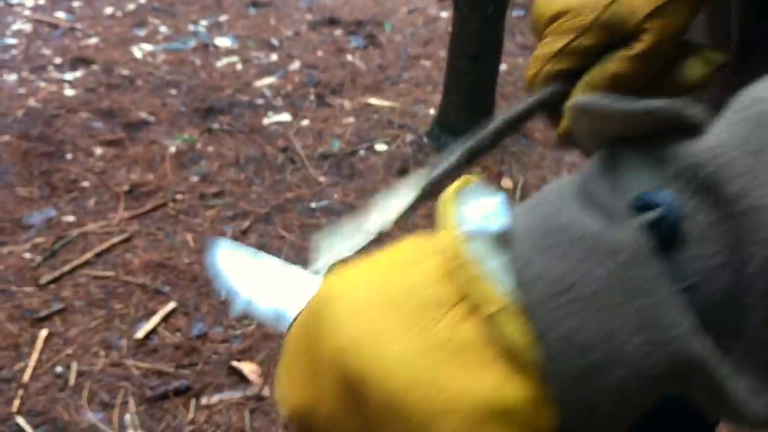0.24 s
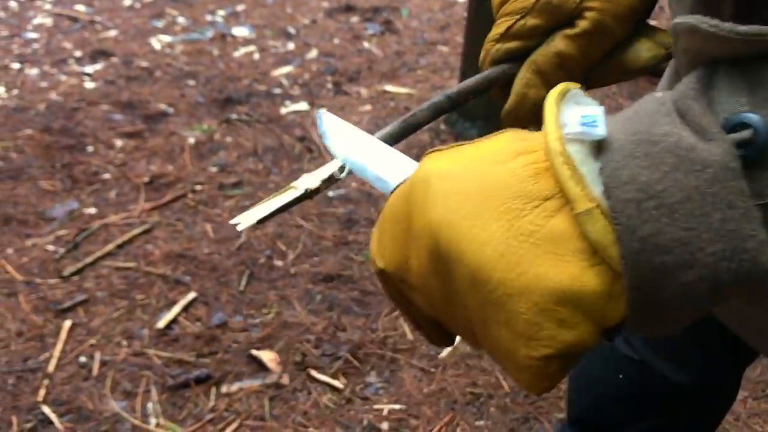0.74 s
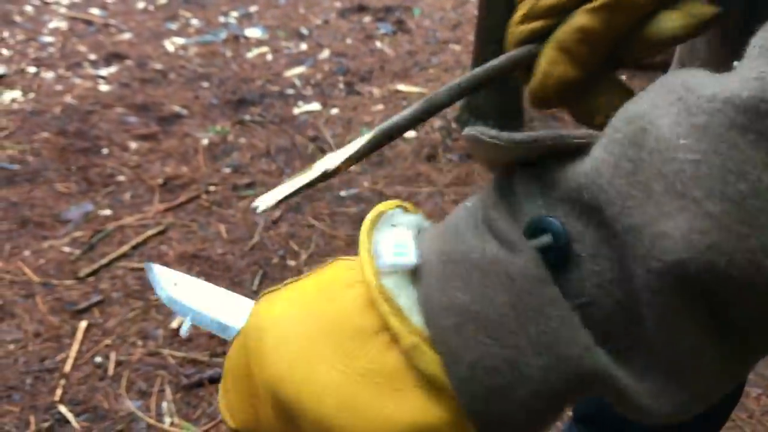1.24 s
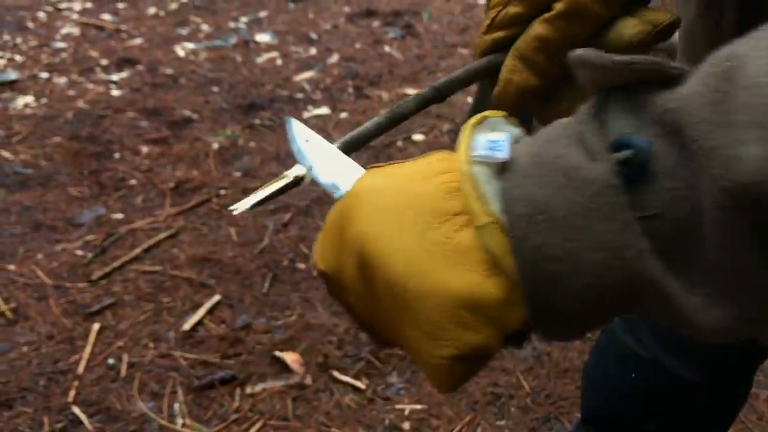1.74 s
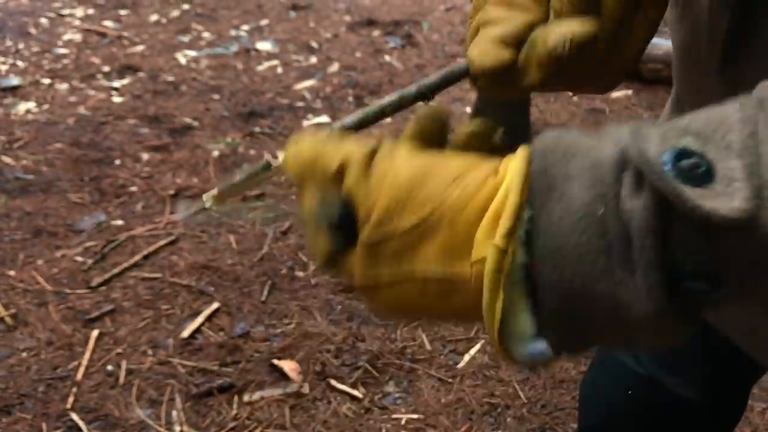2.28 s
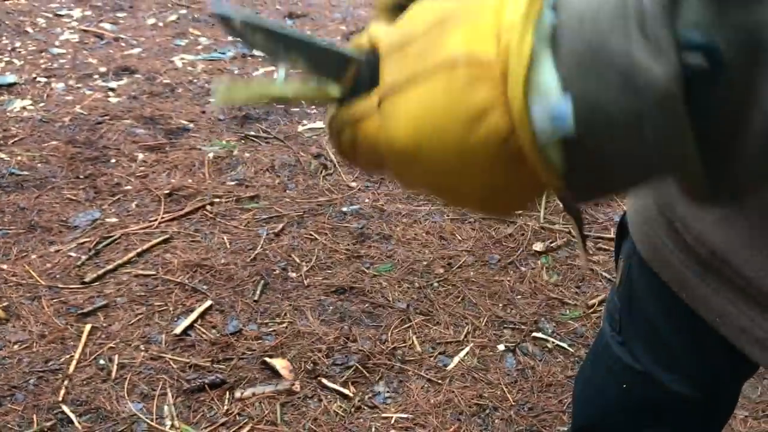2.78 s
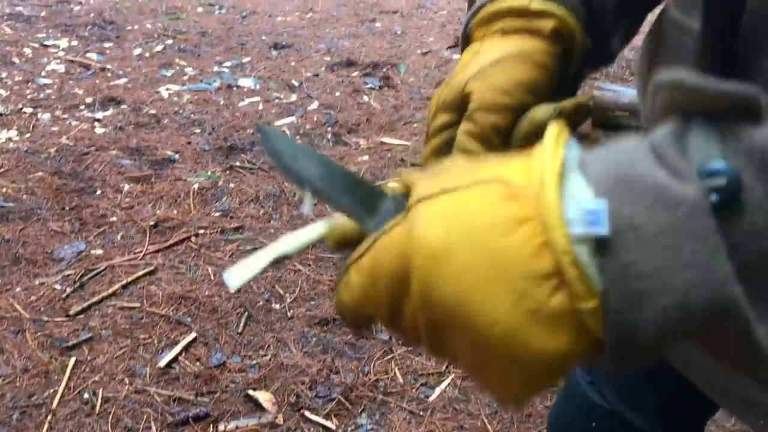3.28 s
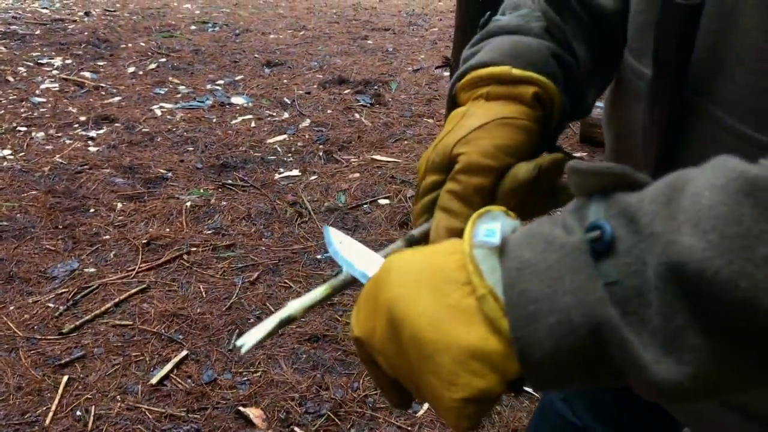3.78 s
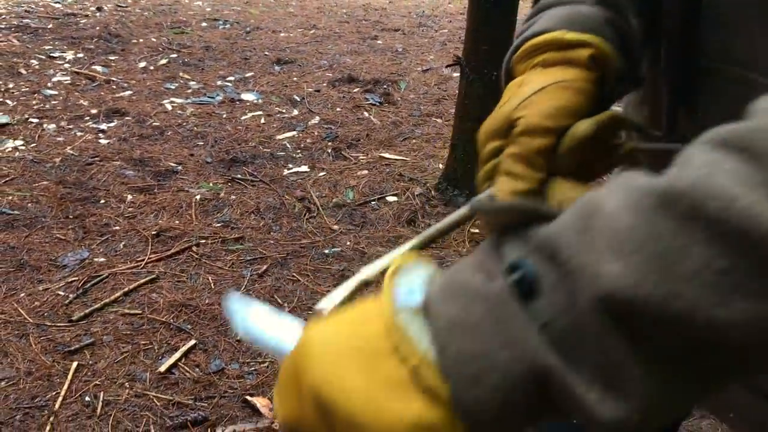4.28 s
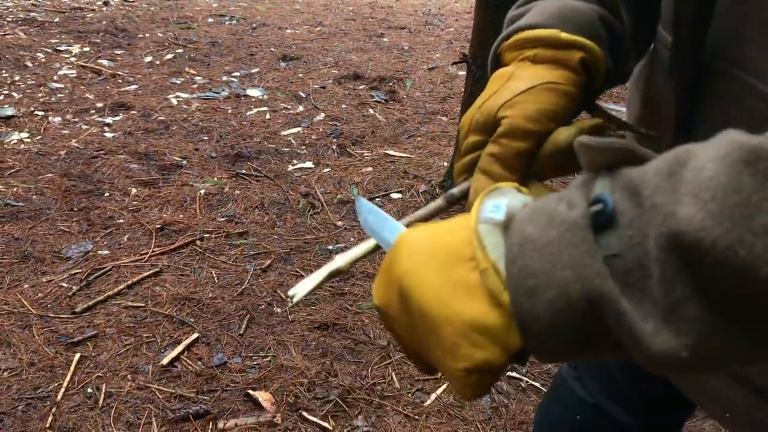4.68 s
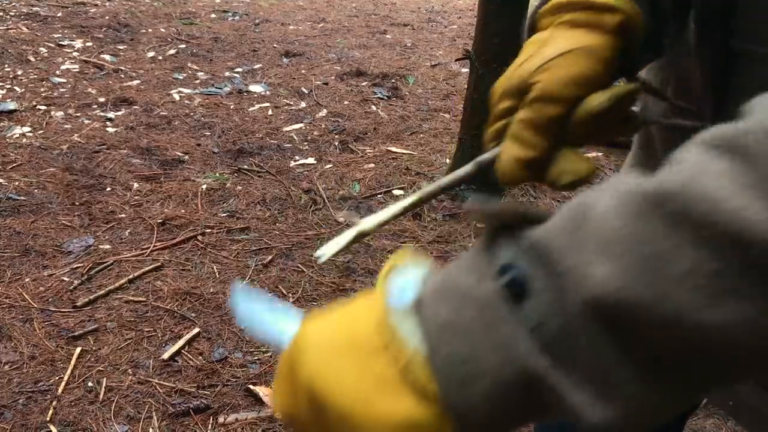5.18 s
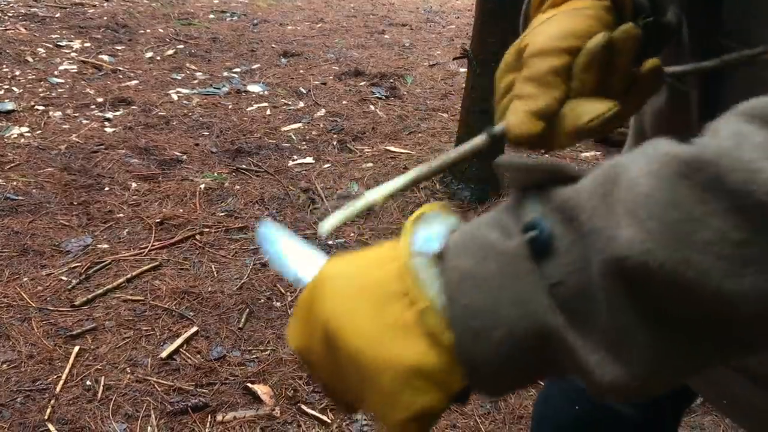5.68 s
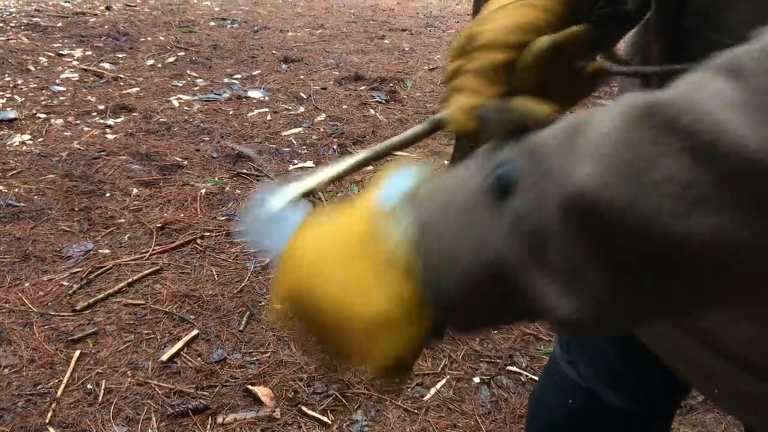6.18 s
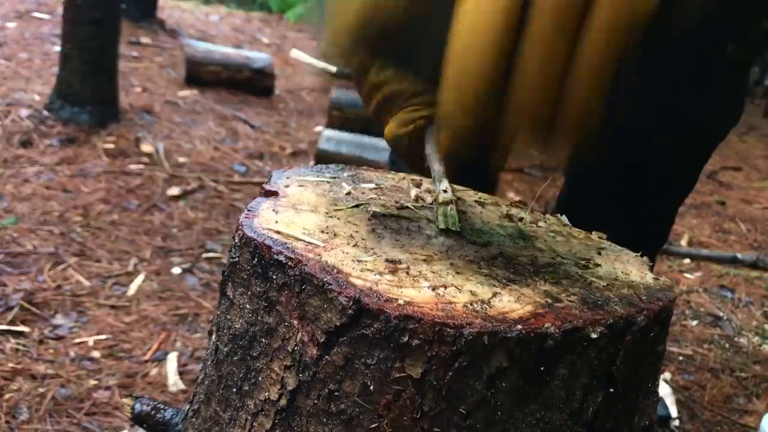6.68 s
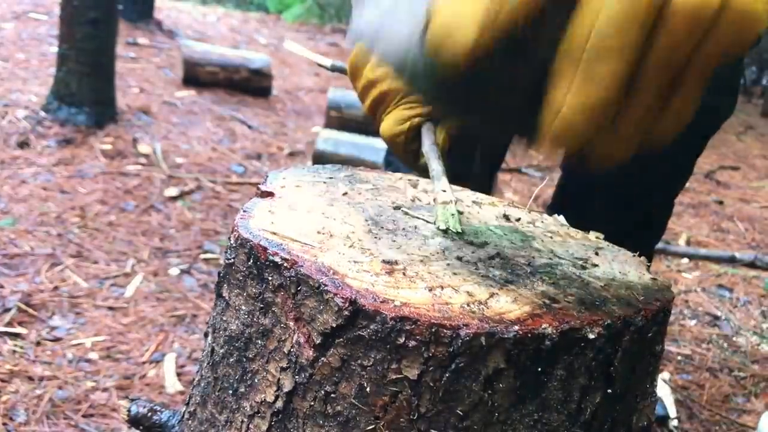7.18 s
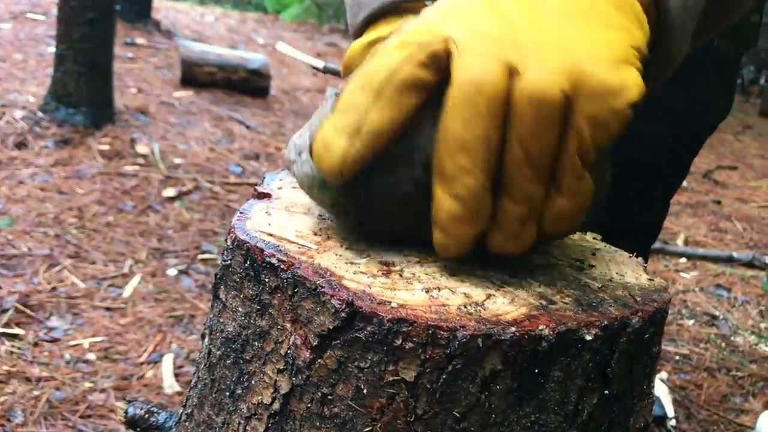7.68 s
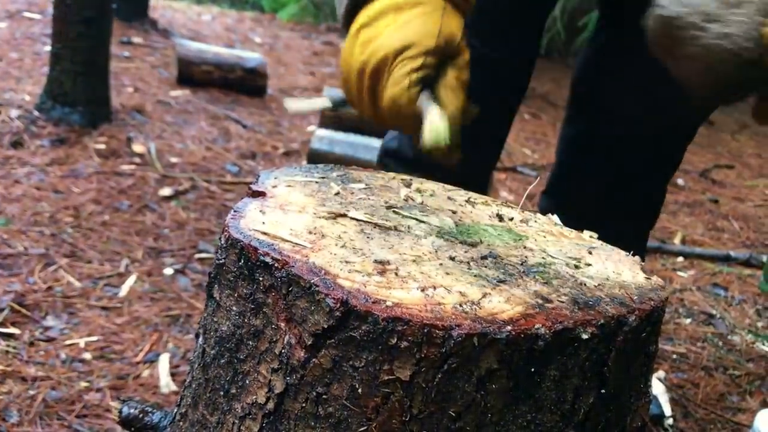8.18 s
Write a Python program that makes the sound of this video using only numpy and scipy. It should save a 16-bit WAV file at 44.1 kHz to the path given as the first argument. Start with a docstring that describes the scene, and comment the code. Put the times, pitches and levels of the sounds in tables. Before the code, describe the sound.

Water drips and patters on a taut sheet in a forest camp while a knife faintly shaves a twig, then a stone pounds a stump.

```python
"""A forest camp in the rain: water drips from the trees onto a taut sheet, over fine patter and far hiss.
Each drop is a short falling chirp with a scatter of echoes, a slow swing of the sheet and a noise splash.
Dry wood ticks as short noise bursts, a knife shaves a twig in swelling bright noise, and a filtered-noise
rumble hums far off. Near the end a stone pounds a stump: rough pushes ring decaying modes, with a crack,
a low thud and echoes."""
import sys
import numpy as np
from scipy import signal
from scipy.fft import rfft, irfft
from scipy.io import wavfile

SR = 44100
rng = np.random.default_rng(int(sys.argv[2]) if len(sys.argv) > 2 else 0)


def wav_record(signal):
    """Record a signal, one row per channel, as 16-bit PCM in the file named by sys.argv[1]."""
    frames = np.transpose(np.atleast_2d(signal))
    bounded = np.clip(frames, -1, 1)
    # unit amplitude maps onto the largest positive 16-bit level
    quanta = np.round(bounded * 32767).astype(np.int16)
    wavfile.write(sys.argv[1], SR, quanta)


N = 372644  # length in samples

# Spectrum of the far rumble. Each row: frequency in Hz, relative density in dB per Hz.
RUMBLE_SPECTRUM = [(15, -38), (25, 13.5), (76, 19), (150, 11.5), (260, -15), (340, -29), (570, -120)]
# Faint hums in the rumble, perhaps far engines. Each row: start in seconds, end in seconds, pitch in Hz, level in dB.
FAR_HUMS = [(0.6, 3.5, 87, -62), (3.6, 5.8, 118.1, -61.5), (5.6, 6.2, 75.1, -62), (5.8, 6.7, 118.3, -62.5),
            (6.7, 7.8, 95, -55.5)]
# Bright swishes of the blade along the twig and of the sleeves.
# Each row: middle in seconds, length in seconds, level in dB.
BLADE_SWISHES = [(0.268, 0.063, -46.5), (0.482, 0.021, -55), (0.598, 0.15, -55), (0.79, 0.084, -55),
                 (1.186, 0.089, -58), (1.297, 0.044, -55), (1.898, 0.03, -46), (2.226, 0.053, -54.5),
                 (3.074, 0.12, -52), (3.596, 0.062, -57), (4.09, 0.037, -52), (4.237, 0.12, -53),
                 (4.54, 0.084, -57.9), (5.032, 0.044, -54), (5.13, 0.064, -49.5), (5.557, 0.13, -53),
                 (5.755, 0.14, -51), (5.922, 0.054, -55), (6.284, 0.057, -52), (6.368, 0.02, -46),
                 (6.666, 0.038, -50), (7.073, 0.1, -56), (8.1, 0.056, -57)]
# Ticks of dry wood. Each row: start in seconds, level in dB, centre in Hz, hiss in dB against the body.
WOOD_TICKS = [(0.3456, -27, 5660, -10), (0.713, -41, 13900, -5), (0.772, -40, 12800, -1),
              (1.1552, -35.5, 2500, -6), (1.2366, -28, 5600, -2), (1.9432, -29, 3230, 0.5),
              (1.9694, -43, 2620, 2), (2.608, -28.5, 3100, -21), (2.9167, -35.5, 13400, -15),
              (3.386, -45, 2860, 4), (3.481, -47.5, 6360, 10), (3.7853, -45, 13100, -5),
              (4.2896, -32, 2700, -0.5), (5.1105, -36, 14400, 3), (5.122, -31.5, 3120, -9),
              (5.1453, -36, 2780, 2.5), (5.2403, -45.5, 2590, 5), (5.5205, -34, 3360, 0),
              (5.7715, -33, 4010, -1), (6.0325, -42, 14270, -6), (6.2687, -25, 11000, 3),
              (6.2926, -29.5, 3500, 1.5), (6.3056, -32, 3650, -5), (6.6404, -32, 3390, 0),
              (6.6654, -30, 5100, -13), (7.188, -42, 3250, 1), (7.2162, -39, 7650, 4),
              (7.486, -40, 5310, -13), (8.081, -41, 5600, 2)]
# Stone landing flat on the stump. Each row: start in seconds, level in dB, crack in dB, ground thud in dB,
# thud delay in seconds, echo in dB, echo centre in Hz.
STUMP_THUMPS = [(6.8092, -7, -13.5, -9, 0.0105, -28.5, 1320), (7.6225, -10, -16.5, -9.5, .013, -30, 1100)]
# Modes of the stump. Each row: frequency in Hz, level in dB, t60 in seconds.
STUMP_MODES = [(192.6, -14, 0.12), (259, -13, 0.1), (382, 2.5, 0.02), (507, 1.5, 0.027), (650, 9.5, 0.012),
               (810, 0, 0.021), (1100, 1.5, 0.027), (1305, 3.5, 0.027), (1940, 2, 0.017)]
# Sharp knocks of the stone. Each row: start in seconds, level in dB, crack in dB, ground thud in dB,
# thud delay in seconds, echo in dB, echo centre in Hz.
STONE_KNOCKS = [(7.5403, -13.5, -10, -41, 0.003, -23, 1330),
                (7.8477, -15.5, -8.5, -44, 0.0033, -29.5, 3630)]
# Modes of the knock. Each row: frequency in Hz, level in dB, t60 in seconds.
KNOCK_MODES = [(172, -3, 0.014), (319, 5, 0.014), (760, -30, 0.036), (1060, 13, 0.0071),
               (1620, 9.5, 0.0055), (2470, 13, 0.0047), (3230, 0.5, 0.012), (4290, 3.5, 0.0082),
               (5570, -16, 0.0058)]
# Spectrum of the far rain. Each row: frequency in Hz, relative density in dB per Hz.
HISS_SPECTRUM = [(150, -37), (260, -9.5), (361, 4), (451, -24), (585, -18.5), (1050, 0), (1920, -9),
                 (4870, -14), (5400, -11.5), (7620, -17), (9540, -12.5), (10400, -18.5), (14700, -11.5),
                 (16000, -11)]
# Loudness of the small rain. Each row: time in seconds, patter in dB, hiss of far rain in dB.
RAIN_LEVELS = [(0.0, -53, -55), (0.35, -54, -54.5), (0.84, -57, -54.5), (1.34, -51, -55),
               (1.76, -53.5, -55), (2.28, -51.5, -55.5), (3.39, -54.5, -55), (3.51, -50, -55.5),
               (3.81, -50, -54.5), (4.09, -49, -56), (4.54, -53, -56), (5.53, -52.5, -54.5),
               (6.14, -55, -56), (6.63, -51, -53.5), (6.85, -58.5, -57), (8.45, -52.5, -56)]
# Large drops on the sheet. Each row: start in seconds, level in dB, pitch in Hz, splash in dB against the chirp.
LARGE_DROPS = [(0.0364, -38, 1400, -21), (0.0517, -34.5, 980.0, -23), (0.156, -22.0, 950, -15),
               (0.2167, -26.5, 1160, -12), (0.2264, -25, 910, -27), (0.2742, -22.5, 980.0, -14),
               (0.2927, -29, 1210, -6), (0.3662, -32.5, 1410.0, -10), (0.3734, -33, 1060.0, -22.0),
               (0.42, -20.5, 1060, -13.5), (0.474, -29.5, 1060.0, -9), (0.5267, -22.5, 1460.0, -28),
               (0.546, -32, 1130, -8), (0.5575, -17.5, 790, -12), (0.5729, -28, 1020.0, -19.0),
               (0.6349, -25.5, 1060.0, -10.5), (0.8271, -34.5, 1280, -20.0), (0.8352, -42, 1140, -20.0),
               (0.847, -25.5, 1130, -35), (0.907, -33, 920, -21.0), (0.9608, -34.5, 1160, -20.0),
               (1.038, -22.5, 1210, -17), (1.1028, -36.4, 1150.0, -19.0), (1.114, -28, 1020.0, -21.0),
               (1.1369, -27, 1030, -15), (1.156, -19.5, 770.0, -21.0), (1.2268, -35, 770.0, -7),
               (1.2553, -37, 1100.0, -21.0), (1.2731, -29, 1200.0, -18.0), (1.2885, -36.1, 940.0, -3),
               (1.2947, -26.7, 1230, -26), (1.3042, -18, 960, -30), (1.3178, -27, 940.0, -14),
               (1.3232, -25.5, 1100.0, -15.0), (1.3682, -32, 1200.0, -22.0), (1.417, -32.5, 1160, -17),
               (1.433, -32, 1280, -20), (1.4564, -23.5, 905, -16), (1.4718, -28, 1020.0, -12),
               (1.5477, -31.4, 980.0, -24), (1.5863, -20.5, 970, -33), (1.6525, -29.5, 870.0, -19),
               (1.6554, -30.1, 1200.0, -22.0), (1.6712, -24, 1060.0, -19), (1.7602, -26.5, 790, -10.5),
               (1.8935, -15.5, 1060.0, -12), (1.9943, -24.5, 1160, -29), (2.05, -25, 1260, -17),
               (2.0546, -27, 910, -19), (2.1197, -26.5, 980, -8.5), (2.153, -34, 1020.0, -25),
               (2.183, -33, 1060.0, -15.0), (2.1916, -29.8, 800.0, -17.0), (2.2505, -22, 830, -10),
               (2.2957, -39.5, 1020.0, 1), (2.3258, -30.5, 1200.0, -31), (2.351, -37, 1150.0, -19.0),
               (2.4124, -29.5, 800.0, -11), (2.4653, -23.5, 930, -16.0), (2.5005, -31.5, 960, -18),
               (2.5596, -22.5, 1010, -16), (2.5864, -32, 1060.0, -10), (2.6313, -28, 1060.0, -10),
               (2.7327, -29.1, 1170, -15), (2.7863, -25.5, 1030, -18), (2.8035, -28.5, 830.0, -15),
               (2.8351, -22.5, 1060.0, -21.0), (2.8546, -30, 770.0, -7.5), (2.8601, -28.2, 910, -17.0),
               (2.944, -35, 1200.0, -18), (3.0171, -33, 1350.0, -9), (3.0448, -20.5, 830.0, -13),
               (3.0892, -29, 1300.0, -17), (3.0955, -22, 990, -31), (3.1325, -27, 970, -14),
               (3.1627, -36.1, 776, -15), (3.174, -27.5, 1100.0, -22.5), (3.3252, -27.5, 1030, -10),
               (3.3326, -27.5, 1190, -16.0), (3.3417, -34, 1510, -17), (3.347, -36, 1200.0, -18.0),
               (3.3942, -20.5, 1100, -12.5), (3.4293, -28, 1060.0, -9), (3.4563, -17.5, 970, -21),
               (3.4934, -30.5, 770.0, -11.0), (3.5295, -25, 1060.0, -24), (3.5379, -35, 1200.0, -7),
               (3.5432, -27.5, 770.0, -5.5), (3.5482, -46, 830.0, -11), (3.569, -27.7, 1100.0, -15),
               (3.5903, -32, 1030, -16.0), (3.6101, -22, 1300, -11), (3.6907, -32.2, 1060.0, -9),
               (3.8313, -29, 1240, -19.0), (3.8942, -36.4, 1150.0, -17.0), (3.9283, -27.3, 1150.0, -25),
               (3.9339, -38, 800.0, -23.0), (3.9584, -26.5, 1180, -18.0), (4.0046, -23, 940.0, -11.5),
               (4.0607, -23, 900.0, -7.5), (4.0863, -18.5, 1060.0, -14.5), (4.1559, -27, 1060.0, -11),
               (4.166, -39, 1150.0, -1), (4.1747, -28.5, 940.0, -13.0), (4.1797, -29, 1030, -18.0),
               (4.2062, -27.5, 1160, -16.0), (4.225, -26, 950, -14), (4.2323, -23.5, 1000, -20),
               (4.2358, -27, 1100.0, -15.0), (4.2438, -25, 1030, -8), (4.251, -31, 870.0, -13.0),
               (4.2693, -27.5, 770.0, -10), (4.2916, -26, 1060.0, -6), (4.3233, -36.3, 1460.0, -20),
               (4.4175, -31.5, 1140, -20.0), (4.4973, -21.5, 1060.0, -21.0), (4.51, -28, 960, -15),
               (4.5255, -24.5, 1290, -27.0), (4.5423, -23.5, 1320, -16), (4.606, -29.5, 1060.0, -15),
               (4.677, -29, 1230, -14), (4.684, -27.5, 1020.0, -12), (4.7276, -26.5, 960, -8),
               (4.7346, -39, 1500, -6), (4.8281, -30.5, 1060.0, -11), (4.8442, -35, 1280, -15.0),
               (4.919, -23, 980.0, -12), (5.0078, -25.5, 1140, -18), (5.0584, -37.5, 1060.0, -17),
               (5.0744, -37.5, 1140, 1), (5.163, -36.2, 880, -6), (5.2648, -21, 875, -19.0),
               (5.2715, -33, 1150.0, -9.0), (5.2796, -16, 920, -20), (5.3474, -23.7, 1040, -14),
               (5.3654, -20, 1300.0, -33), (5.4178, -33.5, 1100.0, -21), (5.4657, -21.5, 930, -34),
               (5.505, -33.5, 1060.0, -22.0), (5.5427, -22.5, 1330, -18), (5.5523, -22.5, 1100.0, -10),
               (5.599, -26, 1100.0, -12), (5.6177, -19, 980.0, -14), (5.7479, -18, 1040, -29),
               (5.7886, -25.2, 890, -18.0), (5.8092, -20.2, 1060.0, -14.5), (5.9038, -33, 804, -18.0),
               (5.9214, -23.5, 1100.0, -11), (5.93, -27, 900.0, -15.0), (5.9495, -27, 1020.0, -16.0),
               (5.9556, -35, 1410.0, -12.0), (6.012, -29, 1350.0, -8.5), (6.0477, -31.5, 1100.0, -8),
               (6.0608, -28.5, 940, -5.5), (6.2344, -32, 1340, -18.0), (6.2445, -16, 1060.0, -13),
               (6.3415, -33.5, 790, -4), (6.3647, -18.7, 940.0, -15), (6.4242, -36, 980.0, -20.0),
               (6.4736, -36.3, 1150.0, -10), (6.4978, -24.5, 1050, -10.5), (6.531, -24.5, 1180, -19.0),
               (6.613, -34, 770.0, -5), (6.6398, -26, 1650.0, -12), (6.6538, -17, 930, -14),
               (6.715, -31.0, 1020.0, -5), (6.842, -31, 1060.0, -18.0), (7.0202, -35, 1180, -21),
               (7.0702, -26.5, 800.0, -17), (7.0809, -28, 920, -14), (7.1421, -22.5, 990, -18),
               (7.1692, -34, 1100.0, -17), (7.1878, -36.4, 1060.0, 3), (7.32, -26.5, 1190, -6.5),
               (7.3247, -36, 1640, -12), (7.3831, -32.7, 1150.0, -16.0), (7.4971, -27, 1000, -14),
               (7.571, -37, 1350.0, -12), (7.5764, -30, 1650.0, -12), (7.6006, -34, 980.0, -1),
               (7.728, -35, 1190, -23), (7.7484, -29.5, 1180, -24), (7.7603, -34.9, 1200.0, -5),
               (7.7632, -34.5, 1450, -14.0), (7.8113, -33.0, 1060.0, 0), (7.8162, -25.3, 1030, -10),
               (8.0019, -24.5, 1240, -13), (8.065, -33, 1460.0, -18), (8.0821, -30, 900.0, -7),
               (8.1052, -31.5, 900.0, -12), (8.1912, -35, 900.0, -19.0), (8.2007, -23.5, 1100.0, -15),
               (8.25, -30.5, 1150.0, -4), (8.2742, -33, 1100.0, -9.0), (8.2823, -36, 1280, -15.0),
               (8.3778, -35.5, 1280, -11), (8.4465, -34.5, 770.0, -5)]

RUMBLE_DB = -55.5
HUM_FADE_S, HUM_WAVER_HZ = 0.14, 1.5  # the waver reaches this far to each side of the pitch
TICK_T60_S = 0.009
THUD_HZ, THUD_T60_S = 77, 0.043
ECHOES_DB = -13  # scatter of echoes against the chirp of each large drop
CUTOFF_HZ = 16700


def from_db(db):
    """Decibels to gain."""
    return 10 ** (np.asarray(db) / 20)


def rms_one(x):
    """Scaled to unit rms."""
    return x / np.sqrt(np.mean(x ** 2) + 1e-20)


def add(out, s, x):
    """Mixes x into out from time s on."""
    i = round(s * SR)
    out[i:i + len(x)] += x[:N - i]


def decay(t, t60):
    """Exponential decay that loses 60 dB in t60 seconds."""
    return from_db(-60 * t / t60)


def band(x, low_hz, high_hz):
    """Causal band-pass."""
    edges = [low_hz, min(high_hz, 0.45 * SR)]
    return signal.sosfilt(signal.butter(2, edges, "band", fs=SR, output="sos"), x)


def coloured(spectrum):
    """Steady noise with the given spectrum; rms 1."""
    hz, level = np.transpose(spectrum)
    grid = np.maximum(np.fft.rfftfreq(N, 1 / SR), 1)
    gain = from_db(np.interp(np.log(grid), np.log(hz), level, left=-90, right=-90))
    return rms_one(irfft(gain * rfft(rng.standard_normal(N)), N))


def scattered(per_s, spread_db):
    """Clicks at random moments, a few much larger than the rest."""
    size = from_db(spread_db * np.minimum(rng.exponential(1, N), 3))
    return size * (rng.random(N) < per_s / SR)


def rumble():
    """Low far-off rumble: steady noise weighted to the bass."""
    return from_db(RUMBLE_DB) * coloured(RUMBLE_SPECTRUM)


def hums():
    """Narrow noise bands: each hum fades in, holds and fades out, wavering a little."""
    t, out = np.arange(N) / SR, np.zeros(N)
    for start, end, hz, db in FAR_HUMS:
        fade = np.clip(np.minimum(t - start, end - t) / HUM_FADE_S, 0, 1)
        tone = rms_one(band(rng.standard_normal(N), hz - HUM_WAVER_HZ, hz + HUM_WAVER_HZ))
        out += from_db(db) * fade * tone
    return out


def far_rain():
    """Distant rain blurs into a steady hiss; rms 1."""
    return coloured(HISS_SPECTRUM)


def crackle():
    """Tiny droplets and sparks tick faintly in the treble, each about a millisecond of noise."""
    gate = signal.lfilter([1], [1, -0.96], scattered(150, 3.5))
    return from_db(-63.5) * rms_one(band(gate * rng.standard_normal(N), 5700, 17600))


def swishes():
    """Each stroke swells and dies; fibres tear in a fine bright grain."""
    t, level = np.arange(-8000, 8000) / SR, np.zeros(N)
    for s, length_s, db in BLADE_SWISHES:
        add(level, s + t[0], from_db(db) * np.exp(-(t / (0.5 * length_s)) ** 2))
    # the grain takes a new random level every 64 samples
    roughness = from_db(2.5 * rng.standard_normal(N // 64 + 1)).repeat(64)[:N]
    grain = rng.standard_normal(N) * roughness
    treble = rms_one(band(grain, 10300, 17200))
    middle = rms_one(band(grain, 2900, 7900))
    return level * (treble + from_db(-4) * middle)


def ticks():
    """A fibre breaks: a short spiky burst around its own pitch, with some hiss above."""
    out, t = np.zeros(N), np.arange(900) / SR
    for s, level_db, hz, hiss_db in WOOD_TICKS:
        wide, narrow = rng.standard_normal((2, len(t)))
        body = rms_one(band(narrow * np.abs(narrow), hz / 1.9, hz * 1.3))  # squaring makes it spiky
        hiss = rms_one(band(wide, 5000, 17000))
        add(out, s, from_db(level_db) * (body + from_db(hiss_db) * hiss) * decay(t, TICK_T60_S))
    return out


def ringing(modes, t):
    """Decaying sines of the struck body, alternating in sign."""
    return sum((-1) ** k * from_db(db) * decay(t, t60) * np.sin(2 * np.pi * hz * t)
               for k, (hz, db, t60) in enumerate(modes))


def ground_thud(t):
    """Low thump through the ground, its pitch sagging as it settles."""
    sag = 0.0034 * (1 - np.exp(-t / 0.0046))
    return decay(t, THUD_T60_S) * np.sin(2 * np.pi * THUD_HZ * (t + sag))


def blows(hits, modes, crush_s, crack_t60, echo_s, echo_t60):
    """Crushing the twig rings the modes in a rough burst; crack, late ground thud and smeared echoes
    from the sheet and trunks join in."""
    out, t = np.zeros(N), np.arange(6000) / SR
    ring, thud = ringing(modes, t), ground_thud(t)
    for s, level_db, crack_db, thud_db, late_s, echo_db, echo_hz in hits:
        push = (1 + 0.17 * rng.standard_normal(400)) * t[:400] * np.exp(-t[:400] / crush_s)
        crack, echo, boom = rng.standard_normal((3, len(t)))
        add(out, s, from_db(level_db) * np.convolve(ring, push / push.sum())[:len(t)])

        snap = rms_one(band(crack, 1330, 8800) + 0.37 * band(crack, 7800, 13900))
        add(out, s, from_db(crack_db) * decay(t, crack_t60) * snap)
        add(out, s + late_s, from_db(thud_db) * thud)

        shake = rms_one(band(boom, 120, 410))  # loose bark and soil
        add(out, s + echo_s, from_db(thud_db - 12.5) * decay(t, 0.098) * shake)

        near = rms_one(band(crack, echo_hz / 2, echo_hz * 2))  # nearest ground
        add(out, s, from_db(echo_db - 1) * decay(t, echo_t60) * near)

        smear = rms_one(band(echo ** 3, echo_hz / 4, echo_hz * 1.55))  # cubing makes it sparse
        onset = 1 + 0.79 * np.exp(-t / 0.0041)
        add(out, s + echo_s, from_db(echo_db) * decay(t, echo_t60) * onset * smear)
    return out


def stone_on_stump():
    """Flat landings ring the stump's modes, sharp knocks the shorter, brighter modes of the stone."""
    thumps = blows(STUMP_THUMPS, STUMP_MODES, crush_s=0.0001, crack_t60=0.015, echo_s=0.0032, echo_t60=0.049)
    knocks = blows(STONE_KNOCKS, KNOCK_MODES, crush_s=0.00002, crack_t60=0.0079, echo_s=0.0075, echo_t60=0.09)
    return thumps + knocks


def chirp(hz):
    """Bending wave of one drop: highs run ahead of lows, so the phase grows as the root of time; peak 1."""
    cycles = np.arange(260) / SR * hz
    envelope = cycles ** 0.27 * np.exp(-(cycles / 1.9) ** 2.75)
    wave = np.sin(2 * np.pi * np.sqrt(1.84 * cycles)) * envelope
    return wave / np.abs(wave).max()


def landings(count):
    """Chance for each landing place: sparse echo strengths, splash noise, low flapping of the sheet."""
    white = rng.standard_normal((3, count, 3000))
    return zip(white[0] ** 3, rms_one(band(white[1], 530, 4100)), rms_one(band(white[2], 158, 363)))


def drop(hz, scatter_db, splash_db, sparse, splash, flap):
    """Chirp, its echoes from folds and edges, the slow swing back of the dented sheet and a splash."""
    t = np.arange(len(sparse)) / SR
    wave = band(band(chirp(hz), 74, 3.9 * hz), 40, 7.6 * hz)  # water lands softly: no top

    echoes = rms_one(np.convolve(sparse, wave)[:len(t)])  # a few echoes stand out
    rustle = rms_one(band(sparse, 0.9 * hz, 1.9 * hz))
    echoes = (echoes + from_db(-3) * rustle) * decay(t, 0.048)
    echoes += from_db(-4) * decay(t, 0.084) * flap  # lows last longer
    out = from_db(scatter_db) * echoes * np.clip(t * hz - 1.8, 0, 1)  # enters as the chirp fades

    swing = np.sin(2 * np.pi * 0.177 * np.maximum(t * hz - 2.2, 0))
    out += from_db(-13) * decay(t, 0.04) * swing
    out[:len(wave)] += wave
    splash_fade = decay(t, 0.0022) + from_db(-9.5) * decay(t, 0.039)  # sharp burst, softer tail
    return out + from_db(splash_db) * splash * splash_fade


def patter():
    """Small and far drops fall at random on eight places, each with its own pitch and echoes; rms 1."""
    clicks, place = scattered(250, 5.05), rng.integers(0, 8, N)
    out = np.zeros(N)
    for k, (hz, own) in enumerate(zip(np.geomspace(800, 1700, 8), landings(8))):
        sound = drop(hz, -11, -9, *own)
        out += signal.fftconvolve(clicks * (place == k), sound)[:N]
    return rms_one(out)


def large_drops():
    """Each listed drop strikes the sheet with echoes of its own."""
    out = np.zeros(N)
    for (s, level_db, hz, splash_db), own in zip(LARGE_DROPS, landings(len(LARGE_DROPS))):
        add(out, s, from_db(level_db) * drop(hz, ECHOES_DB, splash_db, *own))
    return out


def scene():
    """All sources, heard by one microphone."""
    s, *levels = np.transpose(RAIN_LEVELS)
    patter_db, hiss_db = [np.interp(np.arange(N) / SR, s, level) for level in levels]
    background = rumble() + hums() + from_db(hiss_db) * far_rain() + crackle()
    camp = swishes() + ticks() + stone_on_stump()
    drips = from_db(patter_db) * patter() + large_drops()
    return (background + camp + drips)[None]


def record(dry):
    """The microphone drops the deepest bass, peaks are rounded, the top is cut."""
    thin = signal.sosfilt(signal.butter(3, 45, "high", fs=SR, output="sos"), dry)
    rounded = 0.85 * np.tanh(thin / 0.84)
    return signal.sosfilt(signal.cheby2(12, 70, CUTOFF_HZ, fs=SR, output="sos"), rounded)


dry = scene()
out = record(dry)
wav_record(out)
```